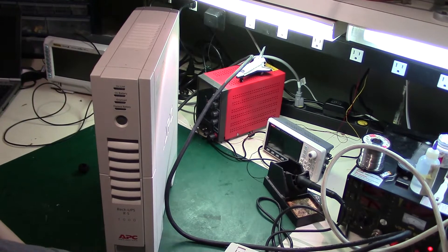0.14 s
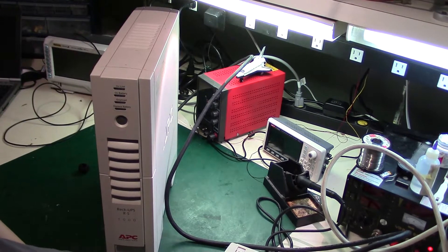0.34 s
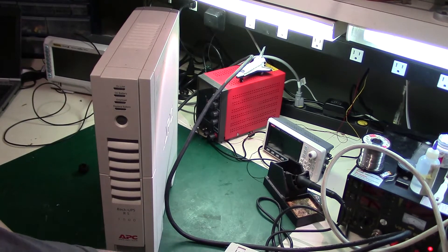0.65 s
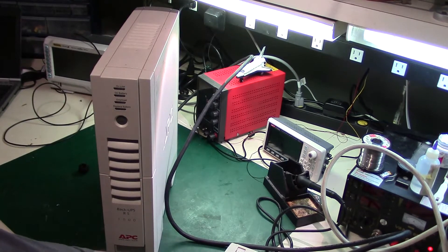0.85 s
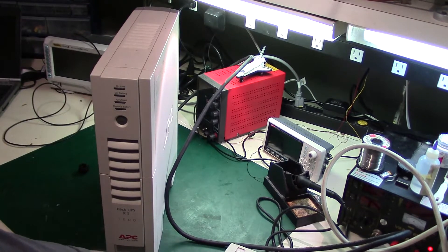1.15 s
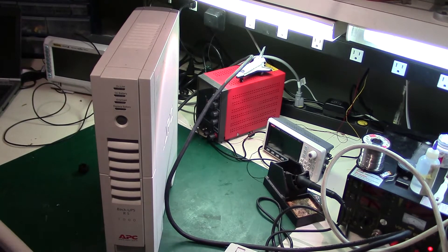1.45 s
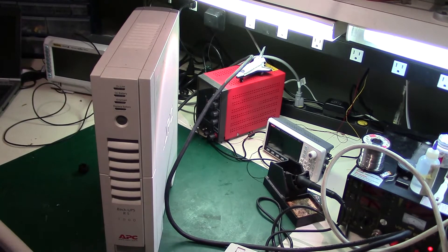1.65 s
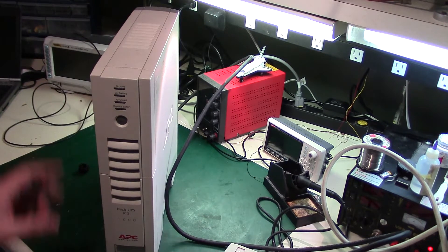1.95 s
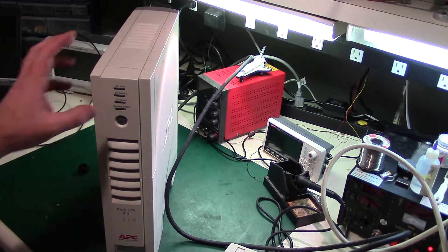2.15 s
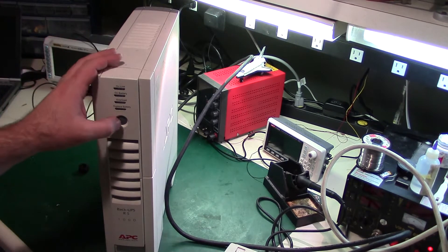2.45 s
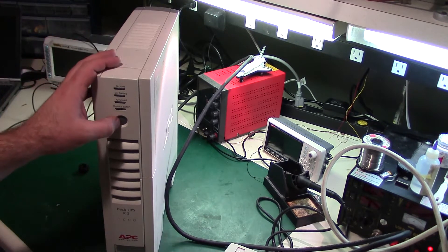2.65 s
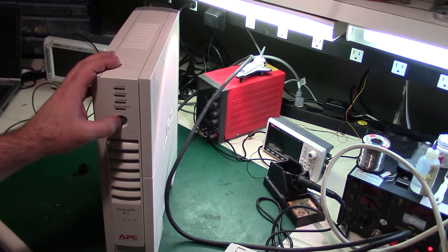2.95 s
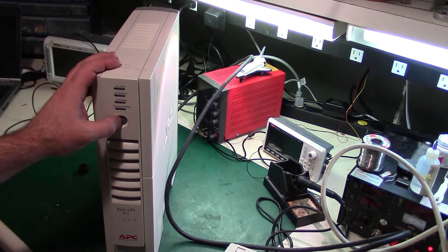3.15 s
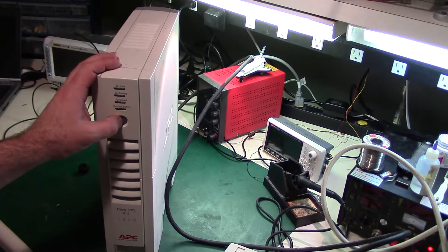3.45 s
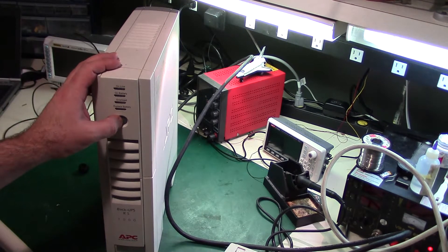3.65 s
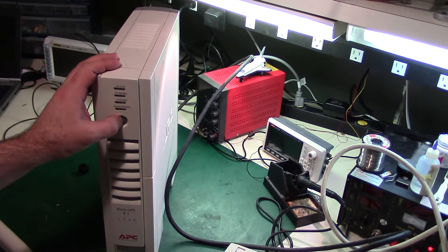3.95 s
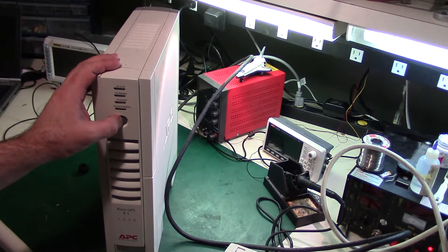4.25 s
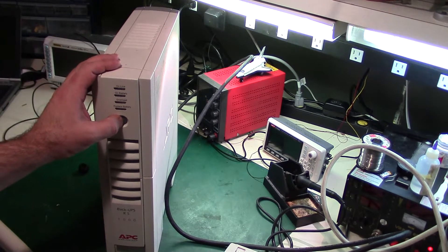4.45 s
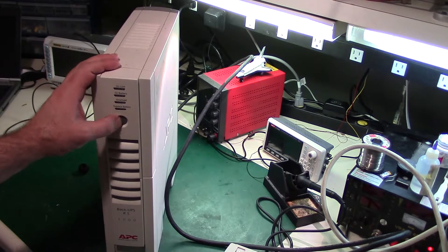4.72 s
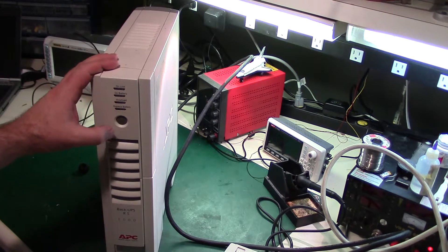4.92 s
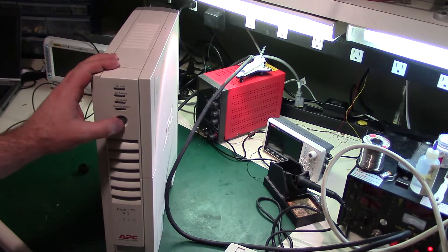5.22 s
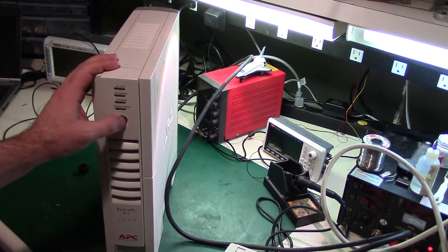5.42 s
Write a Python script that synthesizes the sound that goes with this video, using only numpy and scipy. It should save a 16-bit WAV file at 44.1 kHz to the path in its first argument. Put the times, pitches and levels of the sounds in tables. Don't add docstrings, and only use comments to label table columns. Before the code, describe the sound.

Faint mains hum and airy hiss, small handling taps, one sharp rattling snap, then three echoing button clicks, the middle one weaker.

```python
import sys
import numpy as np
from scipy import signal
from scipy.fft import rfft, irfft, next_fast_len
from scipy.io import wavfile
from scipy.ndimage import uniform_filter1d

SR = 44100
rng = np.random.default_rng(int(sys.argv[2]) if len(sys.argv) > 2 else 0)


def gain_from_db(level_db):
    decades = np.asarray(level_db, float) / 20
    return 10 ** decades


def waveform_to_disk(signal):
    frames = np.transpose(np.atleast_2d(signal))
    scaled = np.clip(frames, -1, 1) * 32767
    samples = np.round(scaled).astype(np.int16)
    wavfile.write(sys.argv[1], SR, samples)


N = 246033
TAIL = int(.8 * SR)
MAINS_HZ = 59.97
BEAM_HZ = 697.5


def gain_at(table, hz):
    table_hz, value = np.transpose(table)
    return np.interp(np.log(np.maximum(hz, 1)), np.log(table_hz), value)


def band_around(centre_hz, hz):
    return np.clip(1 - 2 * np.abs(np.log2(np.maximum(hz, 1) / centre_hz)), 0, 1)


def die_away(t, t60_s):
    return np.exp(-np.log(1000) * t / t60_s)


def walk(rate_hz):
    hold = int(SR / rate_hz)
    steps = np.repeat(rng.standard_normal(N // hold + 1), hold)
    return 1.3 * uniform_filter1d(uniform_filter1d(steps, hold), hold)[:N]


def plateau(start_s, length_s, fade_s):
    t = np.arange(N) / SR - start_s
    return np.clip(np.minimum(t, length_s - t) / fade_s, 0, 1)


def response(colour, size=4096):
    log_gain = gain_at(colour, np.fft.rfftfreq(size, 1 / SR)) * np.log(10) / 20
    cepstrum = irfft(log_gain)
    cepstrum[1:size // 2] *= 2
    cepstrum[size // 2 + 1:] = 0
    click = irfft(np.exp(rfft(cepstrum)), size)[:size // 2]
    return np.pad(click / np.abs(click).max(), (0, TAIL - len(click)))


def ring(modes):
    t = np.arange(TAIL) / SR
    return sum(gain_from_db(db) * np.sin(2 * np.pi * hz * t) * die_away(t, t60_s) for hz, t60_s, db in modes)


def knock(colour, modes, low_hz):
    no_bass = signal.butter(10, low_hz, "high", fs=SR, output="sos")
    x = signal.sosfilt(no_bass, response(colour) + ring(modes))
    return x / np.abs(x).max()


def chatter(x, length_s, rise_s=.00015):
    t = np.arange(int(.03 * SR)) / SR
    size, sign = rng.standard_normal((2, len(t)))
    blows = sign * gain_from_db(3.7 * size) * np.exp(-t / length_s) * np.minimum(t / rise_s, 1)
    return signal.fftconvolve(blows / np.linalg.norm(blows), x)[:TAIL]


# delay t/s, level/dB, top f/Hz
FIRST_ECHOES = [(.0022, 3, 7000), (.0047, 0, 3500), (.0072, 1, 3000), (.0119, 11.5, 780), (.0177, 0, 2500),
                (.025, 8, 700)]
# f/Hz, t60 t/s
ROOM_T60 = [(250, 0.52), (500, 0.34), (1000, 0.34), (2000, 0.36), (4000, 0.36), (8000, 0.29),
            (14000, 0.277)]
# f/Hz, level/dB
ROOM_COLOUR = [(300, 6.5), (700, 1.5), (1500, 1.5), (4000, -5.5), (8000, -4), (14000, -9)]


def room():
    t, hz = np.arange(TAIL) / SR, np.fft.rfftfreq(TAIL, 1 / SR)
    noise = rfft(rng.standard_normal(TAIL)) * gain_from_db(gain_at(ROOM_COLOUR, hz))
    tail = np.zeros(TAIL)
    for centre in 125 * 2 ** np.arange(0, 7.1, .5):
        build_s = .007 * max(1100 / centre, 1)
        build_up = 1 - np.exp(-t / build_s)
        band = irfft(noise * band_around(centre, hz), TAIL)
        tail += band * die_away(t, gain_at(ROOM_T60, centre)) * build_up
    tail *= gain_from_db(-20)
    clutter = irfft(noise / (1 + (1500 / np.maximum(hz, 1)) ** 2), TAIL)
    tail += gain_from_db(-19) * clutter * die_away(t, .04) * np.minimum(t / 0.0003, 1)
    early = 0
    for delay_s, db, top_hz in FIRST_ECHOES:
        echo = gain_from_db(db) * np.exp(-2j * np.pi * hz * delay_s) / (1 + 1j * hz / top_hz) ** 2
        if top_hz > 2 * BEAM_HZ:
            echo = echo * 1j * hz / (BEAM_HZ + 1j * hz)
        early = early + echo
    return tail, irfft(early, TAIL)


def add(out, s, db, near, far, echo, wet_db):
    i = int(s * SR)
    heard = gain_from_db(db) * (near + gain_from_db(wet_db) * signal.fftconvolve(far, echo)[:TAIL])
    out[i:i + TAIL] += heard[:N - i]


# f/Hz, level/dB per Hz
AIR_COLOUR = [(12, -54), (20, -20), (65, -23.5), (124, -13.5), (237, -7), (427, -6), (478, -7.5), (535, -7),
              (839, -9.5), (1140, -11), (5350, -23), (9390, -29), (13500, -37), (15100, -40), (16500, -65)]
# start t/s, length t/s, fade t/s, level/dB
GUSTS = [
    (1.8, 0.65, 0.34, 1.5),
    (3.8, 1.3, 0.42, 0.5),
]


def air():
    level_db, swell_db, flicker_db = -52, 0.4, 1.1
    size = next_fast_len(N)
    hz = np.fft.rfftfreq(size, 1 / SR)
    swell = swell_db * walk(0.59)
    noise = rfft(rng.standard_normal(size)) * gain_from_db(gain_at(AIR_COLOUR, hz))
    out = np.zeros(N)
    for centre in 22 * 2 ** np.arange(0, 10, .5):
        swell_share = min(300 / centre, centre / 300) ** 0.34
        band = irfft(noise * band_around(centre, hz), size)[:N]
        out += band * gain_from_db(swell * swell_share + flicker_db * walk(5.636))
    gusts_db = sum(db * plateau(*shape) for *shape, db in GUSTS)
    return gain_from_db(level_db + gusts_db) * out / np.std(out)


# multiple of the mains, rms level/dB
HUM = [(4, -63.5), (5, -69), (8, -56.3), (10, -69), (14, -78), (63, -82), (74, -83), (86, -84), (87, -82),
       (89, -84), (90, -83), (91, -84), (210, -92), (216, -89.5), (217, -93)]
BUZZ_LIFT_DB = {5: 1.5, 10: 4, 14: 14}


def hum():
    t = np.arange(N) / SR
    buzz = plateau(start_s=.8, length_s=2.57, fade_s=.3)
    cancel_db = -5 * plateau(start_s=0.91, length_s=1.18, fade_s=.3)
    out = np.zeros(N)
    for multiple, db in HUM:
        level_db = db + BUZZ_LIFT_DB.get(multiple, 0) * buzz + 1.2 * walk(2.3)
        if multiple == 8:
            level_db = level_db + cancel_db
        out += np.sqrt(2) * gain_from_db(level_db) * np.sin(2 * np.pi * (multiple * MAINS_HZ * t + rng.random()))
    return out


# t/s, peak level/dB, centre f/Hz, room share level/dB
TAPS = [
    (.434, -40.5, 1250, -9),
    (.5925, -40.5, 510, -19),
    (.818, -48, 1387, -6),
    (.9411, -30, 1150, -13),
    (.951, -34.5, 1490, -6),
    (.984, -52, 1300, -18),
    (1.3071, -26, 1260, -10),
    (1.755, -43.5, 1093, -5),
    (4.734, -46, 964, -19),
]


def taps():
    (tail, early), out = room(), np.zeros(N)
    for s, db, hz, wet_db in TAPS:
        top_hz = hz * 2 ** .7
        colour = [(100, -30), (hz / 2, -8), (hz, 0), (top_hz, -4), (1.4 * top_hz, -17), (16000, -55)]
        body = knock(colour, [(hz, .035, -18)], low_hz=280)
        add(out, s, db, chatter(body, 0.0069), body, tail + early, wet_db)
    return out


def slide():
    centre_hz, width_hz, level_db, grain_db = 1360, 300, -57, 4
    edges_hz = [centre_hz - width_hz / 2, centre_hz + width_hz / 2]
    friction = rng.standard_normal(N) * gain_from_db(grain_db * walk(44.6))
    x = signal.sosfilt(signal.butter(2, edges_hz, "band", fs=SR, output="sos"), friction)
    return gain_from_db(level_db) * plateau(start_s=.72, length_s=.8, fade_s=.1) * x / np.std(x)


# peak level/dB, room share level/dB, rattle level/dB
SNAP = (-3, -9.5, 9)
# f/Hz, level/dB per Hz
SNAP_COLOUR = [(250, -26.5), (550, -12), (850, -3), (1450, 0.5), (2050, -12), (2450, -4), (3000, -3),
               (3700, -11.5), (5000, -8.5), (8000, -34.5), (16000, -61)]
# f/Hz, t60 t/s, level/dB
SNAP_MODES = [(637.2, .03, -36.5), (990, .03, -19.5), (1150, 0.029, -10.5), (1300, 0.053, -10.5),
              (1340, 0.43, -30.5), (1790, .03, -23), (2590, .03, -22.5), (2700, .03, -21)]
# f/Hz, level/dB per Hz
RATTLE_COLOUR = [(300, -58.5), (2000, -17), (4000, -23.5), (5500, -10.5), (6300, -6), (7500, -0.5),
                 (9200, 7), (10500, 2), (11800, 3.5), (13300, -3), (15500, -27), (16600, -44.5)]
# f/Hz, t60 t/s, level/dB
THUMP_MODES = [(92, 0.49, -56.5), (105.6, 1, -57.5), (135, 0.38, -55.5), (289.2, .2, -52)]


def snap():
    snap_s = 1.0767
    db, wet_db, rattle_db = SNAP
    (tail, early), out = room(), np.zeros(N)
    body = knock(SNAP_COLOUR, SNAP_MODES, low_hz=290)
    plain = knock(SNAP_COLOUR, [], low_hz=290)
    rattle = gain_from_db(rattle_db) * response(RATTLE_COLOUR)
    near = gain_from_db(-6) * body + chatter(plain, 0.0035, .001) + chatter(rattle, .0022)
    far = gain_from_db(-10.5) * body + plain + gain_from_db(-5) * rattle
    add(out, snap_s, db, near, far, tail + gain_from_db(-10) * early, wet_db)
    slow_start = np.minimum(np.arange(TAIL) / (0.016 * SR), 1)
    thump = ring(THUMP_MODES) * slow_start
    add(out, snap_s + 0.018, 0, thump, thump, tail, -20)
    return out


# t/s, peak level/dB, room share level/dB, chatter t/s, tick level/dB
PRESSES = [
    (3.2434, -8.5, -2.5, 0.0016, -6.5),
    (4.7657, -21.5, 4.5, 0.0042, -0.5),
    (5.3548, -9, -4.5, 0.0013, -6.5),
]
# f/Hz, level/dB per Hz
PRESS_COLOURS = [
    [(300, -22.5), (450, -6), (680, -1), (950, -8.5), (1350, 1.5), (1800, 0.5), (2200, -6.5), (3000, -6.5),
     (4500, -16), (6500, -37), (16000, -71)],
    [(300, -17), (420, -8), (660, 0.5), (900, -10), (1100, -10), (1500, -19.5), (1900, -16), (2500, -21.5),
     (4000, -28), (6500, -27), (16000, -63)],
    [(300, -19.5), (450, -10), (680, 0.5), (950, -12), (1250, -1.5), (1900, -5.5), (2200, -9.5), (3000, -9),
     (4500, -18), (6500, -32.5), (16000, -84)],
]
# f/Hz, t60 t/s, level/dB for each of the three presses
PANEL_MODES = [(717, 0.089, -20, -9, -18.5), (1136, 0.14, -29, -16, -20), (1237, 0.073, -8, -9, -20),
               (1461, 0.099, -6.5, -6, -11), (1594, 0.038, -24, -41, -35), (1946, 0.043, -31, -12, -12)]
# f/Hz, level/dB per Hz
TICK_COLOUR = [(300, -73), (2000, -12.5), (5000, -9), (6800, -6), (8400, 3), (9800, -7), (11800, -4.5),
               (13400, -13), (14600, -18), (15300, -20), (16500, -36)]


def switch():
    echo, out = sum(room()), np.zeros(N)
    forward = signal.butter(1, BEAM_HZ, "high", fs=SR)
    for k, (s, db, wet_db, chatter_s, tick_db) in enumerate(PRESSES):
        modes = [(mode[0], mode[1], mode[2 + k]) for mode in PANEL_MODES]
        body = knock(PRESS_COLOURS[k], modes, low_hz=348)
        plain = knock(PRESS_COLOURS[k], [], low_hz=348)
        tick = gain_from_db(tick_db) * response(TICK_COLOUR)
        near = signal.lfilter(*forward, body) + chatter(tick, chatter_s)
        far = gain_from_db(-15.5) * body + gain_from_db(-1.0) * plain + gain_from_db(-9.0) * tick
        add(out, s, db, near, far, echo, wet_db)
    return out


def scene():
    return (air() + hum() + taps() + slide() + snap() + switch())[None]


def roll_off(x):
    return signal.sosfilt(signal.butter(12, 16620, fs=SR, output="sos"), x)


def record(dry):
    return roll_off(dry)


dry = scene()
out = record(dry)
waveform_to_disk(out)
```